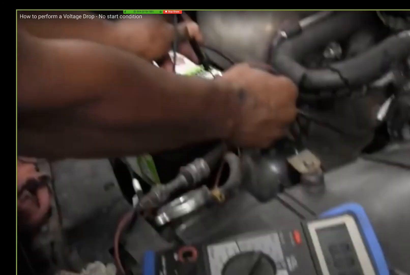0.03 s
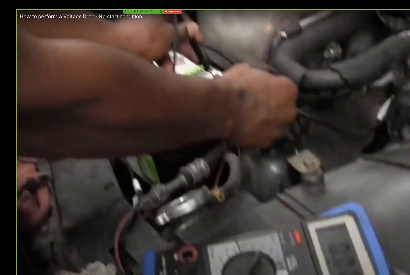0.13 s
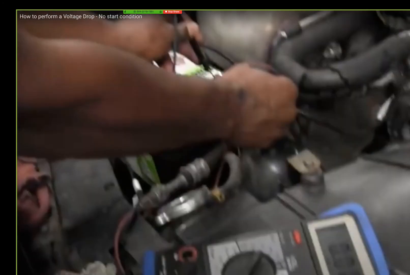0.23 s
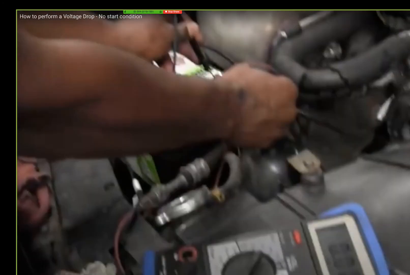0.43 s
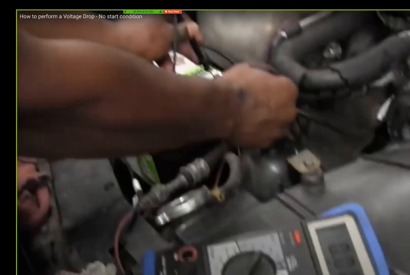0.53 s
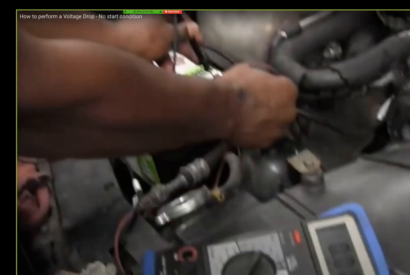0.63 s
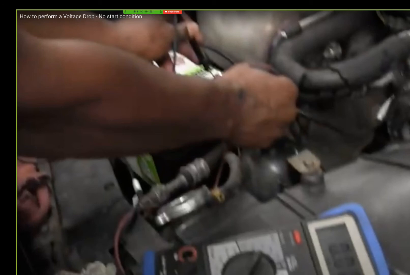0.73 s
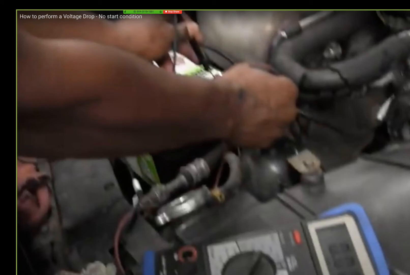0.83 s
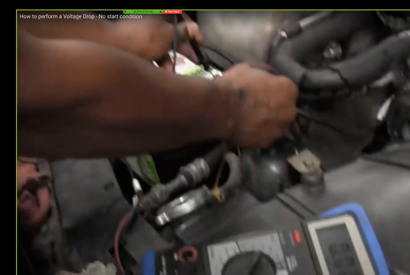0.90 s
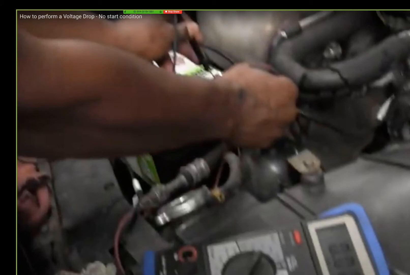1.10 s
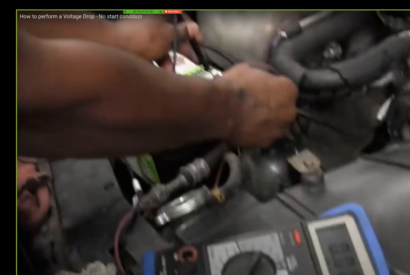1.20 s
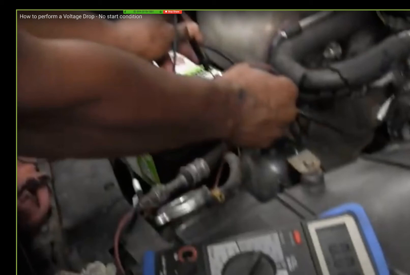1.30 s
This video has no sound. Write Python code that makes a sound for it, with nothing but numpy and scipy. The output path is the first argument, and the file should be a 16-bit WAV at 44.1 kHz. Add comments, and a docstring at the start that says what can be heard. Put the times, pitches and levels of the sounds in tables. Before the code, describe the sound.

A plastic part is pressed home in a car's engine bay with one sharp click and a deep thump. Soft settling bumps and very faint finger rubs follow, close by, over a steady workshop hum.

```python
"""A plastic part pressed home by hand in a car's engine bay: one click and a deep thump.
The catch creaks under load, then slips and snaps, with a short echo off the bonnet and walls.
The housing takes the push and wobbles, with soft settling bumps and a shudder as the hand drags.
Fingers rub very faintly. Underneath lies the workshop: a humming motor, a thin electrical whine,
steadily rushing air and a low drone."""
import sys
import numpy as np
from scipy import signal
from scipy.fft import rfft, irfft
from scipy.io import wavfile
from scipy.ndimage import uniform_filter1d

SR = 44100
rng = np.random.default_rng(int(sys.argv[2]) if len(sys.argv) > 2 else 0)


def generate_wav(signal):
    """Clip the signal to [-1, 1] and save it as 16-bit WAV at the path in sys.argv[1]."""
    frames = np.transpose(np.atleast_2d(signal))
    scaled = np.clip(frames, -1, 1) * 32767
    pcm = np.round(scaled).astype(np.int16)
    wavfile.write(sys.argv[1], SR, pcm)


N = 59535

# The motor's hum. Each row: multiple of the shaft speed, rms level in dB.
MOTOR_HARMONICS = [(1, -60.5), (8, -70), (16, -89), (30, -85.5), (32, -80.5), (36, -87), (40, -86),
                   (48, -89), (104, -102), (130, -99), (132, -94.5)]
# The electrical whine. Each row: pitch in Hz, rms level in dB.
WHINE_TONES = [(2998, -96), (4000, -101), (10998, -106), (11999, -106)]
# The colour of the rushing air. Each row: frequency in Hz, relative level in dB.
AIR_SPECTRUM = [(20, -1), (70, -5.5), (130, -7.5), (270, -11.5), (420, -13), (600, -12), (780, -12.5),
                (1000, -12.5), (1250, -16), (1800, -19.5), (2600, -25), (3400, -24.5), (5000, -32),
                (8000, -36), (10500, -40), (15000, -41.5)]
# Hollow resonances the air excites. Each row: centre in Hz, half-width in Hz, rms level in dB.
AIR_RESONANCES = [(25.14, 7.1, -54), (707.2, 34, -73), (742, 30, -70.5), (823.3, 20, -72.5), (862, 26, -79),
                  (999, 50, -80), (1107, 12, -85)]
# The drone's fader moves. Each row: time in seconds, rms level in dB.
DRONE_LEVELS = [(0, -73.5), (.1, -67), (.18, -71), (.6, -74.5), (.75, -68.5), (.86, -71.5), (.97, -76.5),
                (1.08, -67), (1.16, -68.5), (1.33, -71.5)]
# Finger rubs. Each row: start and length in seconds, centre and half-width in Hz, top level in dB.
FINGER_RUBS = [(0.126, 0.21, 8400, 5000, -85), (0.387, 0.038, 4400, 700, -80.5),
               (.4, .012, 11000, 3500, -83), (0.462, 0.06, 4590, 700, -80), (0.451, .11, 11400, 4000, -88),
               (0.555, 0.07, 4600, 700, -83), (0.658, 0.095, 5160, 652, -81), (0.911, 0.08, 4200, 700, -83),
               (1.175, 0.065, 3100, 600, -78)]
# The press and its settling bumps. Each row: start in seconds, strength in dB, contact in seconds.
PUSHES = [(0.2358, 2.5, 0.0039), (0.3127, -16, 0.0044), (0.416, -8.5, 0.0071), (0.4565, -5, 0.022),
          (0.497, -13, 0.017), (.717, -23.5, 0.0067), (0.744, -27.5, 0.007)]
# The housing's ring. Each row: pitch in Hz, level in dB, t60 in seconds, sign of the first swing.
HOUSING_MODES = [(24.9, -34, 1.05, -1), (26.17, -22.2, 0.36, 1), (31.1, -24.5, 0.33, -1),
                 (71.7, -34, 0.24, -1), (108.6, -36, 0.15, -1), (113.3, -22, 0.047, 1),
                 (158.5, -32, 0.19, -1), (181, -51, 0.55, -1), (197.4, -52, 0.6, 1), (317, -49.5, 0.2, 1)]
# Slips of the catch. Each row: start in seconds, level in dB, treble edge in dB.
CATCH_SLIPS = [(0.2379, 1.5, -19), (0.2393, -1.5, -0.5), (0.2418, -6.5, -8), (.2505, -21, 3),
               (0.256, -14, -14), (.2605, -13, -16)]
# The plastic catch's ring. Each row: pitch in Hz, base level in dB, t60 in seconds.
CATCH_MODES = [(1300, -47, 0.016), (1570, -46.5, 0.012), (1850, -51, 0.013), (2300, -49, 0.0066),
               (3270, -53.5, 0.0055), (4150, -57, 0.0051), (6270, -53.5, 0.0034), (8700, -59.5, 0.0013)]
# The hand dragging on the housing. Each row: start and length in seconds, rms level in dB.
HAND_DRAGS = [(0.258, .2, -54.5), (0.41, .15, -56.5), (0.708, .08, -57.5), (0.786, 0.056, -63.5)]


def amp(db):
    """Decibels to gain."""
    return 10 ** (np.asarray(db) / 20)


def unit(x):
    """Scales to rms 1."""
    return x / np.sqrt(np.mean(x ** 2) + 1e-30)


def add(mix, start, sound):
    """Mixes a sound in at a start time in seconds."""
    part = mix[max(round(start * SR), 0):][:len(sound)]
    part += sound[:len(part)]


def decay(t60):
    """An exponential tail, 60 dB down after t60 seconds."""
    t = np.arange(N) / SR
    return np.exp(-np.log(1000) * t / t60)


def swell(length):
    """A half-sine rise and fall."""
    return np.sin(np.pi * np.arange(0, length, 1 / SR) / length)


def tone(hz, db):
    """A steady sine with its peak level in dB."""
    return amp(db) * np.sin(2 * np.pi * hz * np.arange(N) / SR)


def band_noise(hz, half_width_hz):
    """Noise in a bell-shaped band, rms 1."""
    f = np.fft.rfftfreq(N, 1 / SR)
    bell = 1 / (1 + ((f - hz) / half_width_hz) ** 2) ** 2
    return unit(irfft(rfft(rng.standard_normal(N)) * bell, N))


def motor_hum(shaft_hz=59.05, drift=0.00046, waver=0.024):
    """Harmonics of a nearly steady shaft, each wavering a little in level."""
    turns = np.cumsum(shaft_hz * (1 + drift * band_noise(0, 3))) / SR
    out = np.zeros(N)
    for multiple, db in MOTOR_HARMONICS:
        harmonic = np.sqrt(2) * np.sin(2 * np.pi * (multiple * turns + rng.random()))
        out += amp(db) * harmonic * (1 + waver * band_noise(0, 6.9))
    return out


def electrical_whine():
    """Thin, steady tones, very faint."""
    return np.sqrt(2) * sum(tone(hz, db) for hz, db in WHINE_TONES)


def air_rush(rush_db=-64.5, patch_db=1.87):
    """A broad, slightly patchy rush of air that excites a few hollow resonances."""
    frames = dict(fs=SR, nperseg=1024, noverlap=768)
    f, _, spectra = signal.stft(rng.standard_normal(N), **frames)
    hz, db = np.transpose(AIR_SPECTRUM)
    colour_db = np.interp(np.log(f + 1), np.log(hz), db)[:, None]
    # Random patches of level, smoothed across frequency and then time.
    patches = uniform_filter1d(rng.standard_normal(spectra.shape), size=10, axis=0)
    patches = unit(uniform_filter1d(patches, size=12, axis=1))
    rush = signal.istft(spectra * amp(colour_db + patch_db * patches), **frames)[1][:N]
    hollow = sum(amp(level) * band_noise(centre, width) for centre, width, level in AIR_RESONANCES)
    return amp(rush_db) * unit(rush) + hollow


def workshop_drone():
    """A low, narrow band of noise that swells and sinks."""
    times, db = np.transpose(DRONE_LEVELS)
    fader = amp(np.interp(np.arange(N) / SR, times, db))
    return fader * band_noise(hz=174, half_width_hz=13)


def finger_rubs():
    """Short swells of thin hiss as skin slides over the hoses."""
    out = np.zeros(N)
    for start, length, hz, width, db in FINGER_RUBS:
        arch = swell(length)
        add(out, start, amp(db) * arch * band_noise(hz, width)[:len(arch)])
    return out


def catch_creak(start_s=0.223, length_s=0.026):
    """A brief squeak of plastic under load, leading into the snap."""
    out = np.zeros(N)
    arch = swell(length_s)
    add(out, start_s, arch * tone(hz=742, db=-58)[:len(arch)])
    return out


def housing_thump():
    """Soft, rounded pushes set the housing swinging; longer contact gives a duller bump."""
    force = np.zeros(N)
    for start, db, contact in PUSHES:
        push = swell(contact) ** 2
        add(force, start, amp(db) * push / push.sum())
    ring = sum(sign * tone(hz, db) * decay(t60) for hz, db, t60, sign in HOUSING_MODES)
    return signal.fftconvolve(force, ring)[:N]


def catch_click(band_hz=(1050, 9600)):
    """Each slip rings the catch with a snap of noise; more edge makes both more biting."""
    out = np.zeros(N)
    top_hz = CATCH_MODES[-1][0]
    for start, db, edge_db in CATCH_SLIPS:
        # Neighbouring modes swing opposite ways; the edge acts most on the highest.
        ring = sum((-1) ** k * tone(hz, level + edge_db * hz / top_hz) * decay(t60)
                   for k, (hz, level, t60) in enumerate(CATCH_MODES))
        snap = amp(edge_db - 60) * band_noise(hz=7200, half_width_hz=3800) * decay(t60=0.007)
        add(out, start, amp(db) * (ring + snap))
    return signal.sosfilt(signal.butter(4, band_hz, "bandpass", fs=SR, output="sos"), out)


def bay_echo(sound, send_db=-6.5, predelay_s=0.007, dull_hz=5470):
    """A short, dull, diffuse echo from the bonnet and walls."""
    tail = rng.standard_normal(N) * decay(t60=0.17) * (np.arange(N) / SR > predelay_s)
    tail = signal.lfilter(*signal.butter(1, dull_hz, fs=SR), tail / np.linalg.norm(tail))
    return amp(send_db) * signal.fftconvolve(sound, tail)[:N]


def hand_drags(top_hz=162):
    """Low, uneven shudders while the hand slides over the housing."""
    out = np.zeros(N)
    lowpass = signal.butter(4, top_hz, fs=SR, output="sos")
    for start, length, db in HAND_DRAGS:
        arch = swell(length)
        shudder = signal.sosfilt(lowpass, band_noise(hz=81.9, half_width_hz=31))[-len(arch):]
        add(out, start, amp(db) * unit(arch * shudder))
    return out


def scene():
    """The press over the workshop bed, in mono; only the click feeds the echo."""
    click = catch_click()
    press = housing_thump() + hand_drags() + catch_creak() + click + bay_echo(click) + finger_rubs()
    workshop = motor_hum() + electrical_whine() + air_rush() + workshop_drone()
    return (press + workshop)[None]


def record(dry):
    """A steep high cut takes the very top off the mix."""
    cutoff_hz = 14900
    lowpass = signal.firwin(511, cutoff_hz, window=("kaiser", 9), fs=SR)
    return signal.oaconvolve(dry, lowpass[None], "same")


dry = scene()
out = record(dry)
generate_wav(out)
```